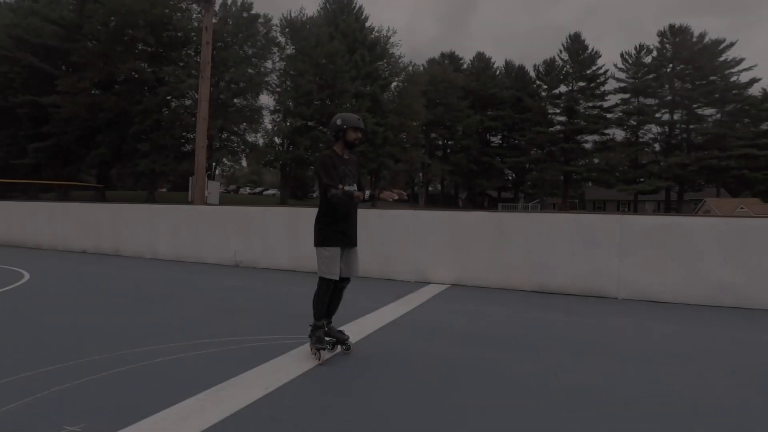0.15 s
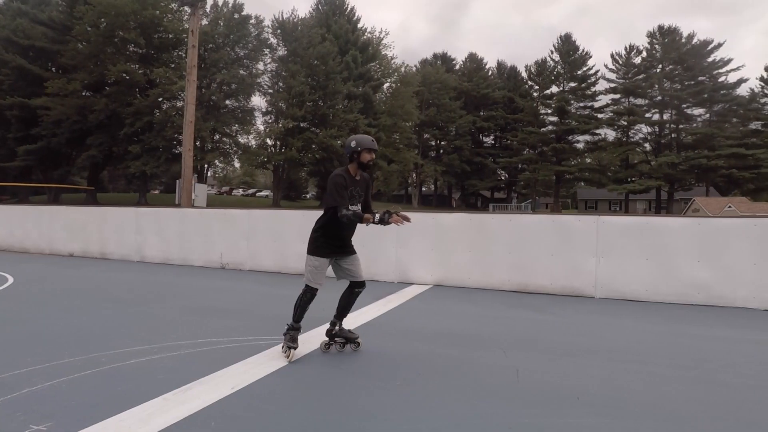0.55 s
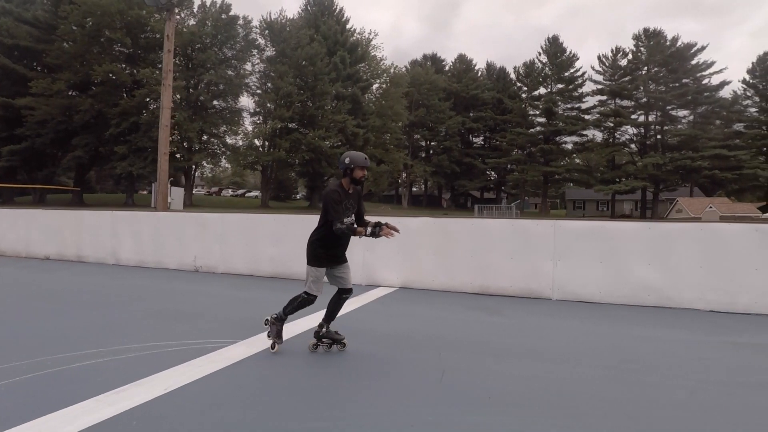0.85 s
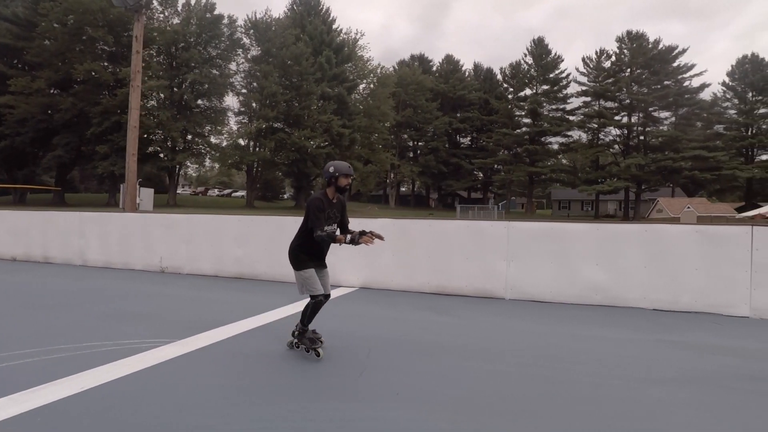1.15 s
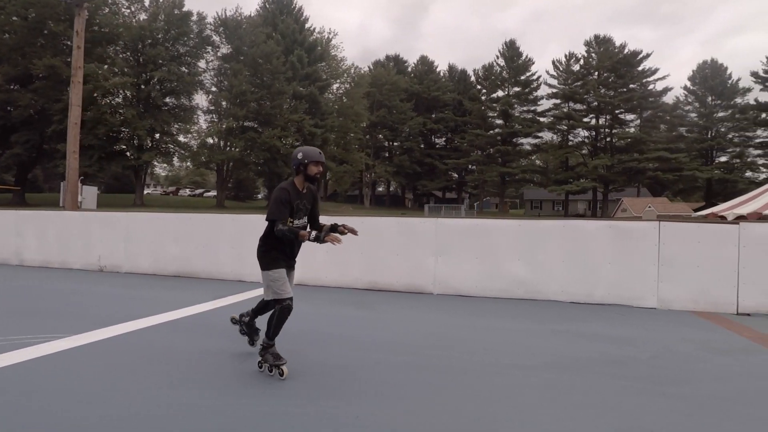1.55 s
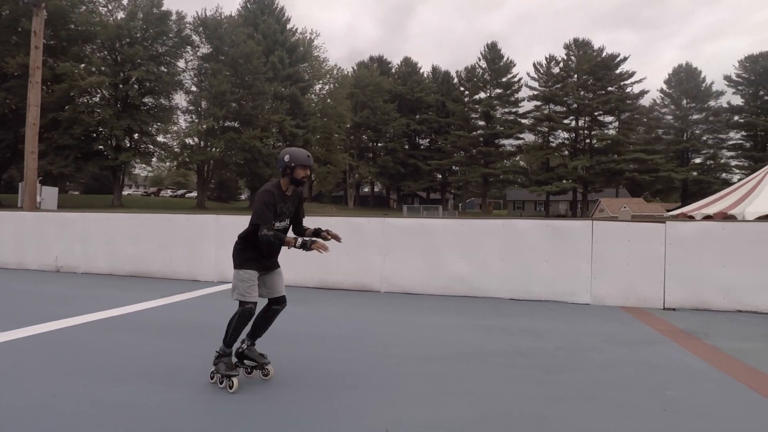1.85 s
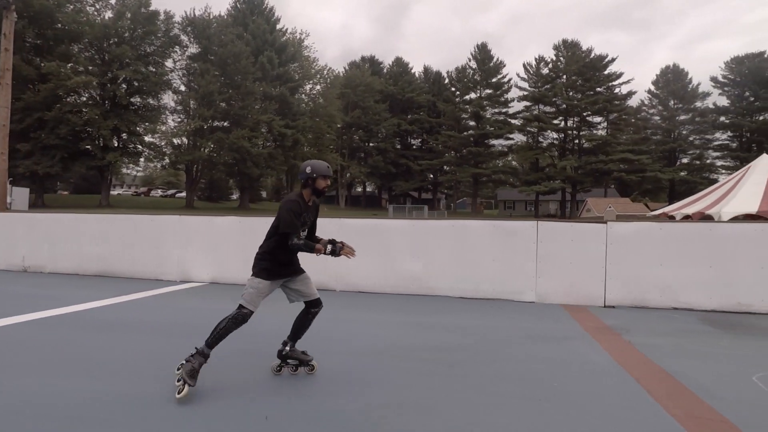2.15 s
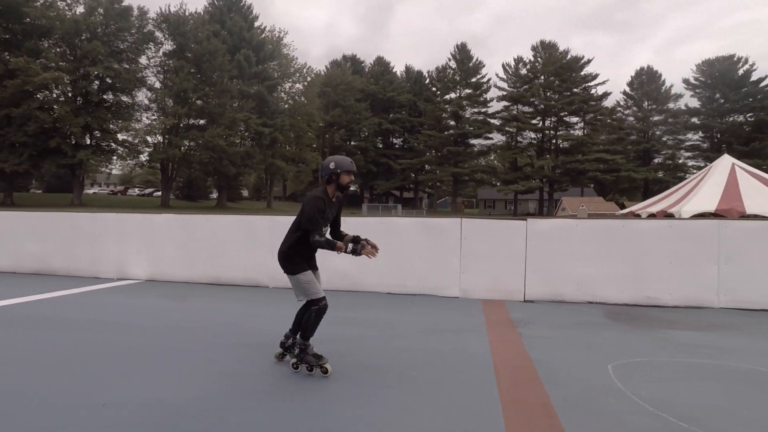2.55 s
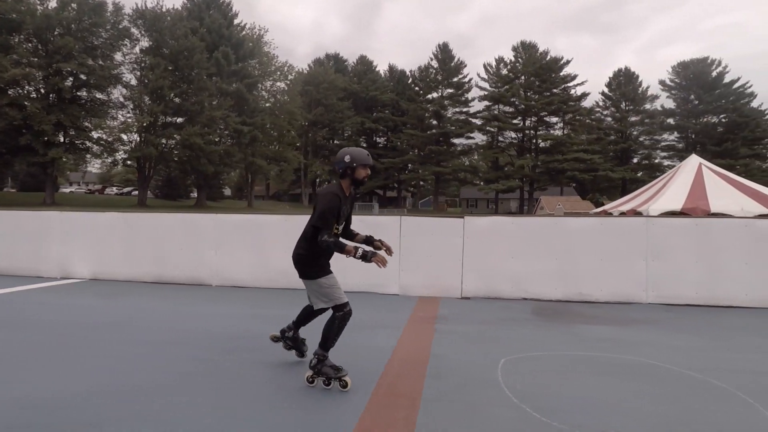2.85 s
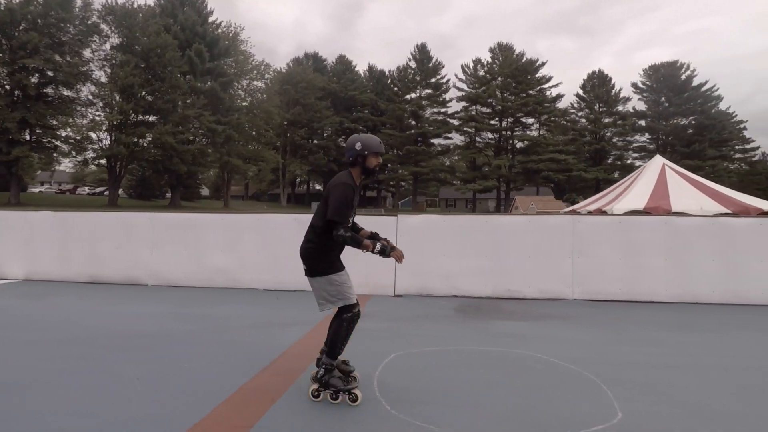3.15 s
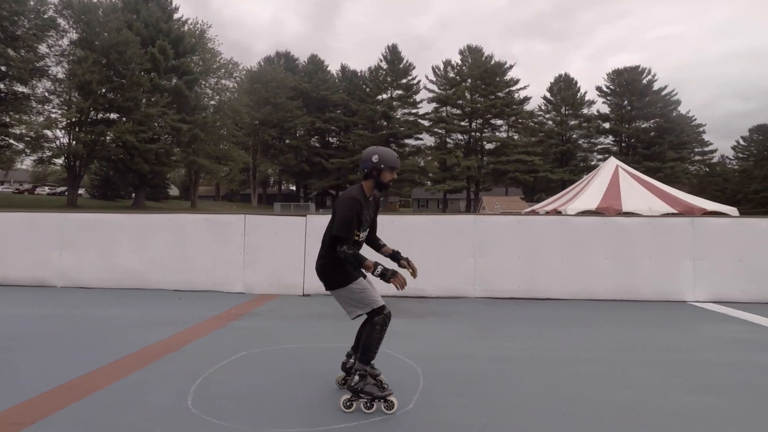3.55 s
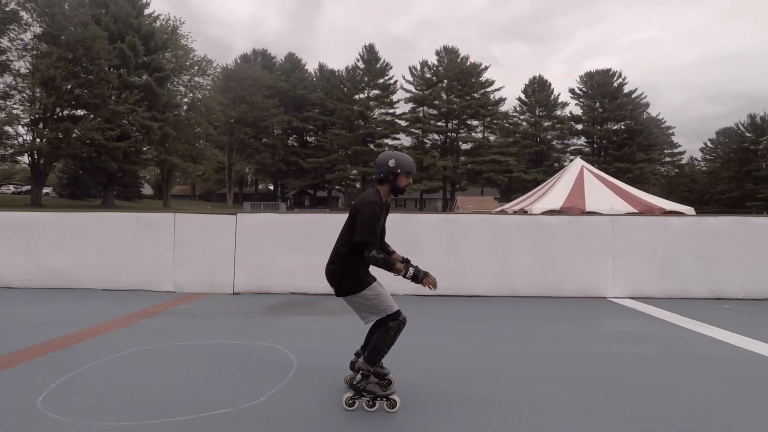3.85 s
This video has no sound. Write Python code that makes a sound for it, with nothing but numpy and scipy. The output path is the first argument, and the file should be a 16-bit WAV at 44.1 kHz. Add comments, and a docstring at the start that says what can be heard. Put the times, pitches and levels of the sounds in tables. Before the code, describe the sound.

Inline skates roll and clack over a hard surface as wind rumbles on the microphone.

```python
"""On an outdoor rink, an inline skater strides along, followed by a camera. The gritty coating excites
the wheels into a hum and a hiss; they scuff by sliding friction at each push and clack on impact as they
are set down. The skates judder, tick and squeak, and the bearings whirr and ring in the final glide.
Turbulent wind buffets the microphone as the pace picks up, over a faint electronic whine."""
import sys
import numpy as np
from scipy.fft import rfft, irfft, next_fast_len
from scipy.io import wavfile
from scipy.ndimage import map_coordinates

SR = 44100
rng = np.random.default_rng(int(sys.argv[2]) if len(sys.argv) > 2 else 0)


def inscribe(sig):
    """Save sig as 16-bit PCM at rate SR to the path in sys.argv[1].

    A 1-D sig is mono; a 2-D sig holds one channel per row.
    Samples are clipped to [-1, 1] before scaling.
    """
    pcm = np.round(np.clip(np.atleast_2d(sig).T, -1, 1) * 32767)
    wavfile.write(sys.argv[1], SR, pcm.astype(np.int16))


N = 176400

# Spectrum of crackling grit and of the crack in each tick: frequency_hz, relative_db
GRIT_SPECTRUM = [(1200, -10), (2300, 0.5), (3080, 0.5), (3400, 5.5), (3580, 3), (3780, 5.5), (4100, 1.5),
                 (5500, 3), (6700, 0.5), (7800, -5), (10100, -7.5), (11300, -13), (13500, -15),
                 (15500, -32)]


def amp(db):
    """Amplitude ratio of a level in decibels."""
    return 10 ** (np.asarray(db) / 20)


def unit(x):
    """Normalisation to rms 1."""
    return x / np.sqrt(np.mean(x ** 2) + 1e-20)


def clock():
    """The time of each sample in seconds."""
    return np.arange(N) / SR


def curve(rows):
    """Linear interpolation between (time_s, value) points."""
    return np.interp(clock(), *np.transpose(rows))


def wobble(knots_per_s):
    """Smooth random modulation: a spline through Gaussian values."""
    return map_coordinates(rng.standard_normal(1000), [clock() * knots_per_s], mode="wrap")


def noise():
    """Gaussian white noise."""
    return rng.standard_normal(N)


def filtered(x, response):
    """Linear filtering: the spectrum of x times a frequency response."""
    size = next_fast_len(N + 8192)
    return irfft(rfft(x, size) * response(np.fft.rfftfreq(size, 1 / SR)), size)[:N]


def coloured(x, spectrum):
    """Spectral shaping by (frequency_hz, relative_db) points, rolling off beyond the ends, at rms 1."""
    hz, db = np.transpose(spectrum)

    def response(f):
        skirts = 1 / np.sqrt((1 + (f / hz[-1] / 1.2) ** 12) * (1 + (hz[0] / 1.3 / (f + 1)) ** 8))
        return skirts * amp(np.interp(np.log(f + 1), np.log(hz), db))
    return unit(filtered(x, response))


def ringing(hz, width_hz):
    """Resonance: noise through two identical band-pass stages, each width_hz wide, at rms 1."""
    return unit(filtered(noise(), lambda f: (1j * f * width_hz / (hz * hz - f * f + 1j * f * width_hz)) ** 2))


def grit(per_s, spread_db, bed):
    """Shot noise: tiny random impacts of uneven size on a bed of white noise, at rms 1."""
    grains = (rng.random(N) < per_s / SR) * np.sign(noise()) * amp(spread_db * noise())
    return unit(unit(grains) + bed * noise())


def strike(start_s, attack_s, t60_s):
    """Envelope of a damped impact: a fast rise and an exponential decay."""
    t = np.maximum(clock() - start_s, 0)
    return (1 - np.exp(-t / attack_s)) * np.exp(-np.log(1000) * t / t60_s)


def gate(start_s, length_s, rise_s, fall_s):
    """Trapezoidal envelope: rise, hold and fall."""
    t = clock() - start_s
    return np.clip(np.minimum(t / rise_s, (length_s - t) / fall_s), 0, 1)


def rolling():
    """Roughness excitation: the coating makes the wheels hum and crackle; both flutter with the load."""
    # Hum of the wheels and hiss of the grit, before their gains: time_s, level_db
    hum_levels = [(.06, -53.5), (.22, -56), (.5, -54), (.62, -56.5), (.75, -54), (1.1, -54.5), (1.6, -56),
                  (2, -54.5), (2.4, -54.5), (3.4, -52), (4, -53)]
    hiss_levels = [(.06, -65.5), (.16, -71.5), (.33, -64.5), (.45, -60.5), (.6, -61.5), (.9, -62.5),
                   (1.12, -63.5), (1.25, -59), (1.55, -64.5), (1.75, -61), (2.35, -63.5), (2.6, -60),
                   (3.11, -58), (3.45, -55), (3.75, -61.5), (4, -58)]
    # Resonances of wheels, frames and floor: frequency_hz, relative_db
    hum_spectrum = [(90, -15), (130, 13.5), (200, 6), (280, 1), (345, -2.5), (382, 3.5), (445, -11),
                    (490, -9), (550, -24), (630, -14), (675, -15.5), (735, -8.5), (790, -14.5),
                    (850, -11.5), (1050, -19.5), (1150, -21.5), (1220, -17.5), (1500, -17), (1615, -11.5),
                    (1850, -18), (2100, -19.5), (2900, -28), (5000, -40.5)]
    hum_gain_db, hiss_gain_db = 13, 1.5
    flutter = wobble(knots_per_s=45)
    hum = amp(curve(hum_levels) + hum_gain_db + 0.98 * flutter) * coloured(noise(), hum_spectrum)
    crackle = coloured(grit(per_s=2300, spread_db=4, bed=0.84), GRIT_SPECTRUM)
    return hum + amp(curve(hiss_levels) + hiss_gain_db + 0.89 * flutter) * crackle


def scuffs():
    """Sliding friction: at each push the wheels slip sideways in a short, grainy burst."""
    # Sideways slips: start_s, length_s, rise_s, level_db
    slides = [(0.176, .11, 0.037, -59), (.4, 0.16, .05, -61), (0.661, 0.11, .04, -56.5),
              (0.824, 0.11, 0.038, -58), (1.15, 0.13, .012, -67), (1.762, 0.1, .035, -55),
              (1.95, 0.19, .03, -61), (2.658, 0.12, .025, -56.5), (2.854, 0.2, .018, -54.5)]
    # Friction noise: frequency_hz, relative_db
    spectrum = [(500, -33), (1700, 6.5), (3200, 0), (4100, 8), (5800, 4.5), (7200, 1.5), (8400, 3),
                (10500, -17), (14000, -42)]
    envelope = sum(amp(db) * gate(start, length, rise, fall_s=0.027) for start, length, rise, db in slides)
    return envelope * coloured(grit(per_s=1800, spread_db=4, bed=0.56), spectrum)


def clacks():
    """Impact excitation: a landing rattles the frame and rings low modes, the higher ones dying sooner."""
    # Wheels set down on the floor: start_s, rattle_db, thud_db
    landings = [(0.472, -43.5, -24.5), (.710, -44, -33), (0.741, -41, -32), (0.751, -54, -50),
                (.767, -45, -48), (.859, -58, -25.5), (1.153, -43.5, -27), (1.812, -39, -35),
                (1.853, -52, -53), (2.242, -44.5, -33)]
    # Rattle of the frame: frequency_hz, relative_db
    spectrum = [(170, -2), (230, 19), (330, 13), (400, 12), (550, -20), (780, 13), (1150, 2), (1700, 6.5),
                (2700, -2), (4000, -1), (6500, -1.5), (9000, -11), (14000, -31)]
    # Low modes of boot and floor: pitch_hz, relative_db
    modes = [(58, -5.5), (128, 4), (205, -12), (315, -9.5)]
    attack_s = .0015
    envelope = sum(amp(db) * strike(start, attack_s, t60_s=.07) for start, db, _ in landings)
    rattle = envelope * coloured(grit(per_s=1200, spread_db=-1, bed=0.55), spectrum)
    thud = np.zeros(N)
    for start, _, thud_db in landings:
        for hz, mode_db in modes:
            decay = strike(start, attack_s, t60_s=0.13 * np.sqrt(100 / hz))
            thud += amp(thud_db + mode_db) * decay * np.sin(2 * np.pi * hz * (clock() - start))
    return rattle + thud


def judders():
    """Forced vibration: the boot shudders more and more as it takes the skater's weight, then settles."""
    # Loadings of the boot: peak_s, level_db
    loadings = [(.53, -41.5), (0.751, -38.5), (.9, -44), (1.165, -42), (1.805, -39)]
    # Low shudder of the boot: frequency_hz, relative_db
    spectrum = [(170, -4), (230, 3.5), (320, 4.5), (410, -3.5), (530, -35), (770, -13), (1000, -25)]
    rise_s, fall_s = 0.053, 0.033
    t = clock()
    load = sum(amp(db) * np.exp(np.minimum((t - peak) / rise_s, (peak - t) / fall_s))
               for peak, db in loadings)
    return load * coloured(noise(), spectrum)


def ticks():
    """Transient excitation: each tick is a broadband crack and a brief chatter into one resonance."""
    # Ticks of the skates: start_s, pitch_hz, ring_db, crack_db
    hits = [(.214, 1790, -49, -62), (.231, 1780, -50, -62), (1.086, 6600, -51, -62),
            (1.365, 3800, -56, -50), (1.376, 4300, -53, -48), (1.390, 3700, -52, -56),
            (1.816, 6500, -44, -47), (1.853, 1700, -44.5, -54), (1.853, 7100, -53, -56),
            (2.055, 5200, -48, -48), (2.605, 5820, -49, -60), (3.144, 6100, -48.5, -56)]
    attack_s = 0.0014
    rings = sum(amp(db) * strike(start, attack_s, t60_s=0.069) * ringing(hz, width_hz=720)
                for start, hz, db, _ in hits)
    crack_envelope = sum(amp(db) * strike(start, attack_s, t60_s=0.032) for start, _, _, db in hits)
    return rings + crack_envelope * coloured(noise(), GRIT_SPECTRUM)


def squeak():
    """Stick-slip friction: a wheel grips and slips for an instant, in a rough chirp of falling pitch."""
    start_s, length_s, start_hz, peak_db = 1.363, .013, 4200, -41.5
    sag_hz_per_s, jitter_rad = 55000, .8
    t = np.clip(clock() - start_s, 0, length_s)
    phase = 2 * np.pi * (start_hz - sag_hz_per_s * t / 2) * t + jitter_rad * wobble(knots_per_s=650)
    return amp(peak_db) * np.sin(np.pi * t / length_s) * np.sin(phase)


def bearings():
    """Shot noise: dense, tiny impacts in the bearings merge into a rattling whirr."""
    # Strength of the whirr: time_s, level_db
    levels = [(.1, -94), (.7, -70), (.82, -56.5), (.97, -69), (1.25, -64.5), (2.1, -63), (2.52, -64),
              (2.56, -59), (2.78, -58.5), (2.92, -57), (3.1, -59.5), (3.45, -57), (3.8, -59.5), (4, -61)]
    # Treble band of the bearings: frequency_hz, relative_db
    spectrum = [(4800, -26), (5800, -5), (6080, 0.5), (6280, -4.5), (6550, -1.5), (7000, -3), (7500, -9.5),
                (7800, -22), (9000, -43)]
    envelope = amp(curve(levels) + 1.6 * wobble(knots_per_s=45))
    return envelope * coloured(grit(per_s=1500, spread_db=4.5, bed=0.99), spectrum)


def singing():
    """Narrow-band resonance: bearings and wheels ring in tones that swell and fade with the load."""
    # Tones of the gliding skate: start_s, length_s, swell_s, pitch_hz, level_db
    tones = [(2.51, 1.6, .05, 6285, -60), (2.95, .9, .28, 3770, -62)]
    sound = np.zeros(N)
    for start, length, swell, hz, db in tones:
        envelope = amp(db + 1.8 * wobble(knots_per_s=14)) * gate(start, length, swell, swell)
        sound += envelope * ringing(hz, width_hz=170)
    return sound


def high_hiss():
    """Band-limited noise: an airy hiss, with spells of thin fizz above it."""
    # Strength of the hiss: time_s, level_db
    air_levels = [(.12, -100), (.3, -69.5), (.68, -69.5), (.78, -62), (.95, -59), (1.25, -68),
                  (1.55, -65.5), (1.75, -63), (2, -66.5), (3, -66.5), (4, -67)]
    # Spells of fizz: start_s, length_s, level_db
    spells = [(.86, 0.22, -76), (1.6, 0.38, -72), (3.35, .3, -75), (3.9, .2, -72)]
    # Bands of the hiss and of the fizz: frequency_hz, relative_db
    air_spectrum = [(5000, -7), (7500, 0.5), (9700, 0.5), (10100, 1), (10600, -2.5), (11400, -5.5),
                    (13300, -10), (15500, -21)]
    fizz_spectrum = [(10500, -24), (11600, -6), (12150, -3), (12700, -7), (14000, -18)]
    air = amp(curve(air_levels)) * coloured(noise(), air_spectrum)
    fizz_envelope = sum(amp(db) * gate(start, length, rise_s=.06, fall_s=.06) for start, length, db in spells)
    return air + fizz_envelope * coloured(noise(), fizz_spectrum)


def wind():
    """Turbulent pressure at the microphone: deep buffeting, and a higher rumble that grows with speed."""
    # Strength of the two bands of turbulence: time_s, level_db
    buffet_levels = [(.06, -34), (.44, -37), (.49, -25), (.55, -31), (.63, -37), (.8, -34.5), (1.49, -34),
                     (1.55, -25), (1.7, -33.5), (1.86, -30.5), (2.05, -32.5), (2.24, -34.5), (2.55, -27.5),
                     (2.7, -20.5), (2.78, -22.5), (2.85, -20), (2.97, -24), (3.25, -18), (3.43, -16),
                     (3.54, -23), (3.76, -24), (3.87, -25.5), (4, -22.5)]
    rumble_levels = [(.06, -49.5), (.8, -40.5), (1.3, -43.5), (1.62, -38.5), (2.05, -45), (2.55, -44.5),
                     (2.84, -28.5), (3.03, -31.5), (3.14, -24.5), (3.22, -29), (3.37, -27), (3.62, -25.5),
                     (3.78, -29), (3.92, -27)]
    # Their pressure spectra: frequency_hz, relative_db
    buffet_spectrum = [(18, -3), (33, -2.5), (53, 1.5), (70, -3), (90, -6), (120, -10), (160, -22.5),
                       (260, -48)]
    rumble_spectrum = [(85, -13.5), (115, 1), (135, 0), (160, -5), (210, -13), (260, -22), (360, -33.5),
                       (430, -54), (600, -68)]
    buffet = amp(curve(buffet_levels) + wobble(knots_per_s=18)) * coloured(noise(), buffet_spectrum)
    rumble = amp(curve(rumble_levels) + wobble(knots_per_s=16)) * coloured(noise(), rumble_spectrum)
    return buffet + rumble


def eddies():
    """Pressure pulses: each eddy thumps the microphone once; small eddies are higher and shorter."""
    # Passing eddies: peak_s, pitch_hz, peak_db
    pulses = [(2.433, 60, -21.5), (2.489, 70, -15.5), (2.844, 66, -11.5), (3.146, 101, -20),
              (3.176, 190, -23), (3.299, 60, -13), (3.347, 200, -21), (3.402, 90, -7.5),
              (3.455, 54.7, -9.5), (3.497, 230, -24), (3.847, 66.3, -12.5), (3.908, 80, -11)]
    half_width_cycles = 0.73
    pressure = np.zeros(N)
    for peak, hz, db in pulses:
        cycles = hz * (clock() - peak)
        envelope = amp(db) * np.exp(-(cycles / half_width_cycles) ** 2)
        pressure += envelope * np.cos(2 * np.pi * (cycles + rng.random()))
    return pressure


def whine():
    """Pure tones: the camera's electronics give off faint, steady sinusoids."""
    # Electronic tones: pitch_hz, rms_db
    tones = [(1000, -71), (7000, -88)]
    return sum(amp(db) * np.sqrt(2) * np.sin(2 * np.pi * hz * clock()) for hz, db in tones)


def scene():
    """Superposition: skates, wind and whine add at one microphone."""
    glide = rolling() + bearings() + singing() + high_hiss()
    strides = scuffs() + judders() + clacks() + ticks() + squeak()
    return (glide + strides + wind() + eddies() + whine())[None]


def record(dry):
    """Gating and band limiting: the sound fades in and out quickly, and the highest treble is cut."""
    start_s, fade_s, top_hz = .046, .003, 15300
    fades = gate(start_s, N / SR - start_s, fade_s, fade_s)
    return filtered(dry[0] * fades, lambda hz: hz < top_hz)[None]


dry = scene()
out = record(dry)
inscribe(out)
```